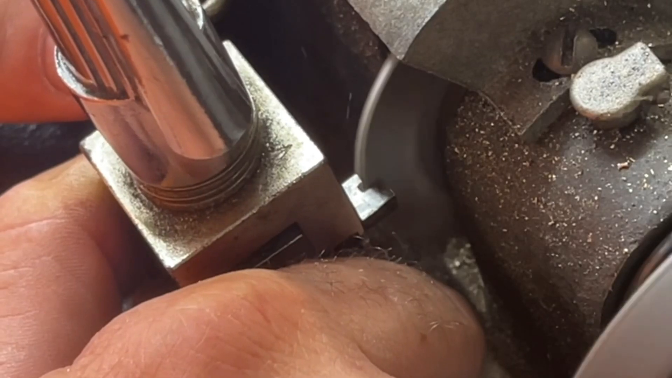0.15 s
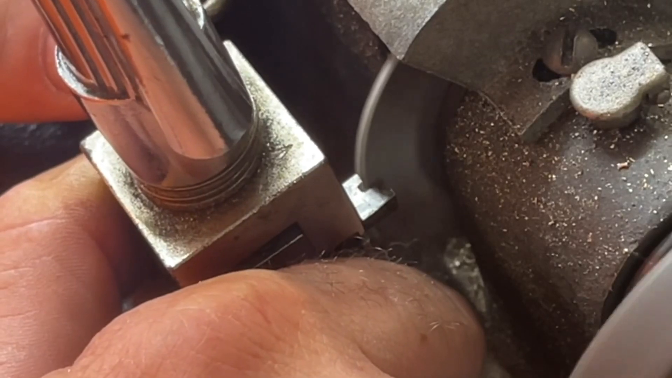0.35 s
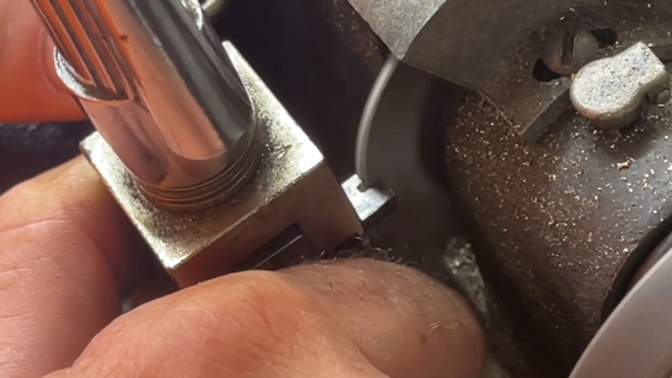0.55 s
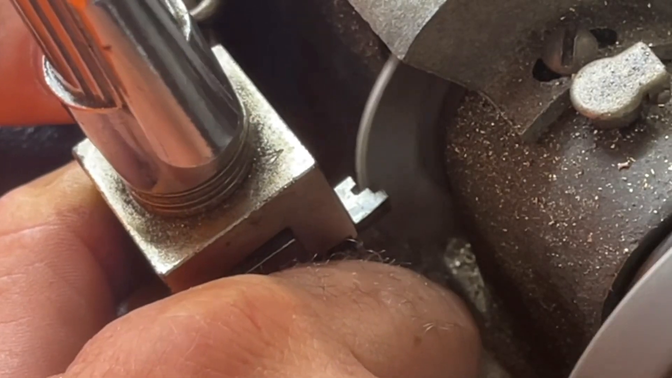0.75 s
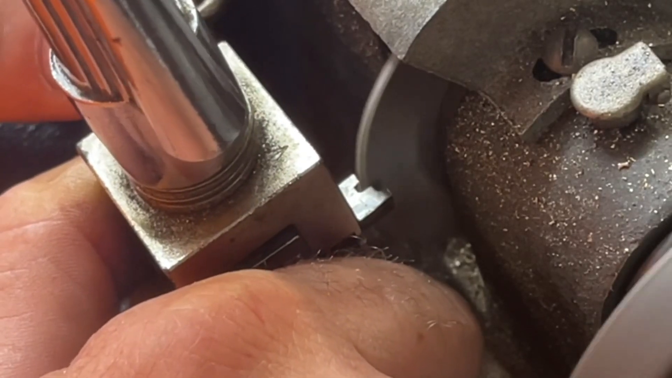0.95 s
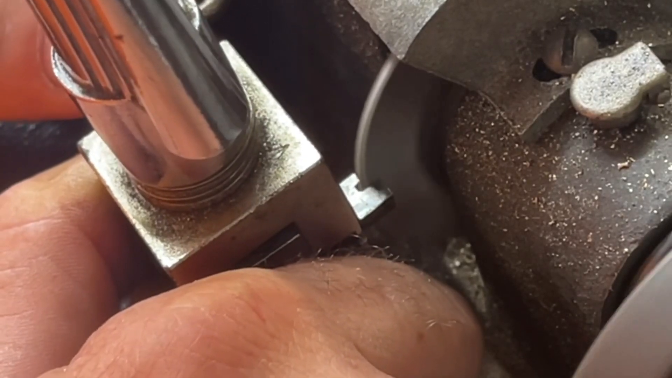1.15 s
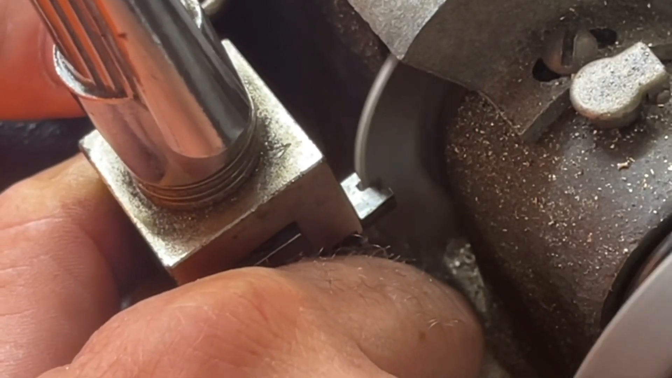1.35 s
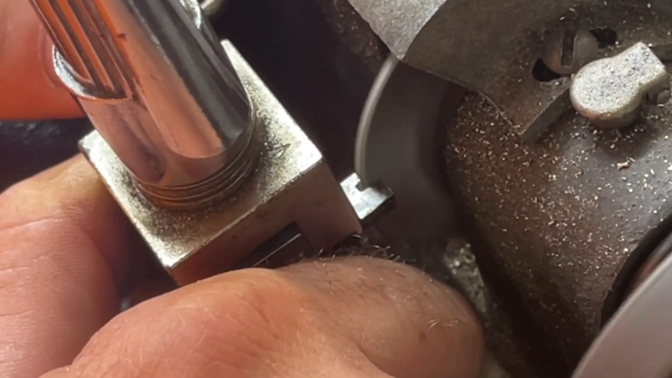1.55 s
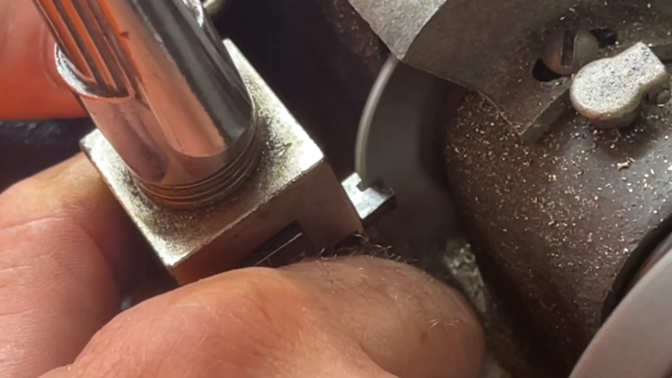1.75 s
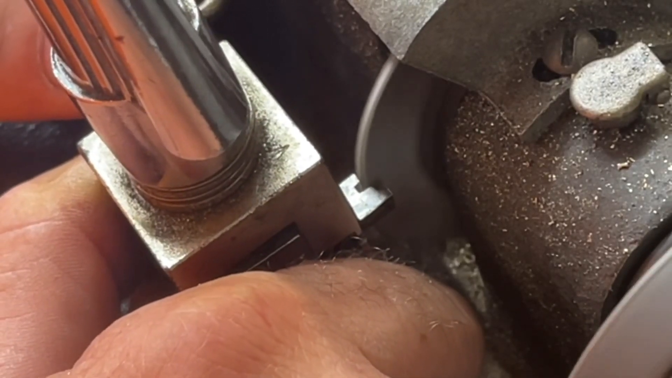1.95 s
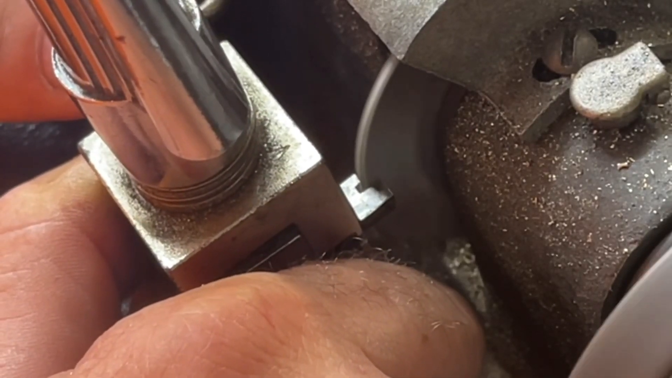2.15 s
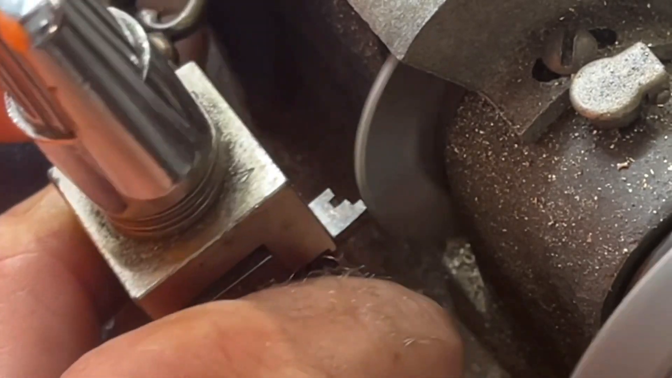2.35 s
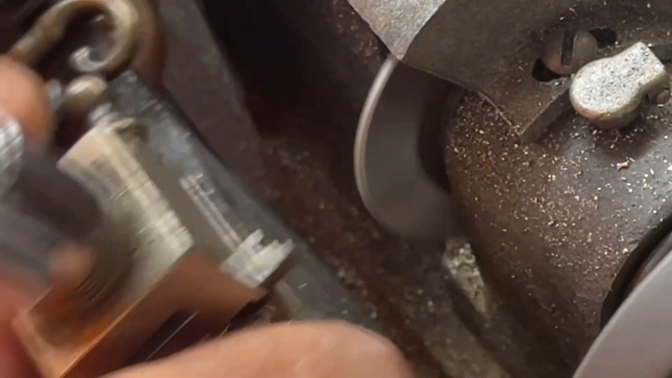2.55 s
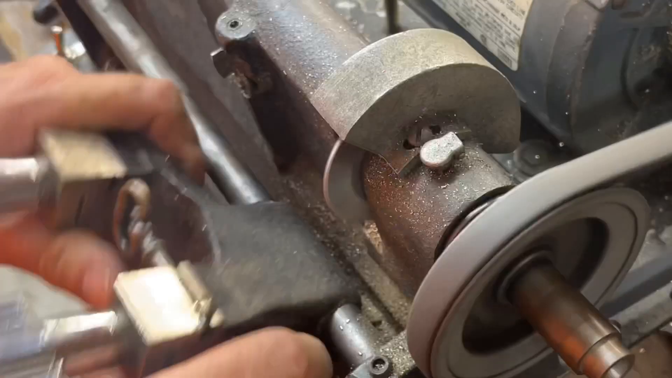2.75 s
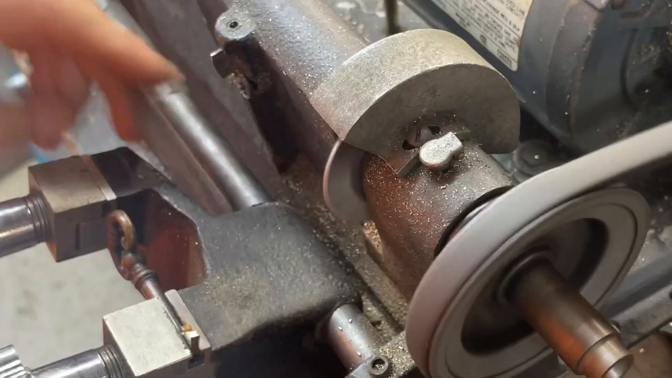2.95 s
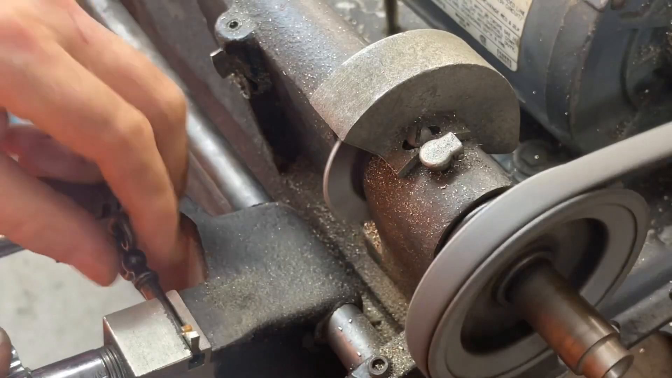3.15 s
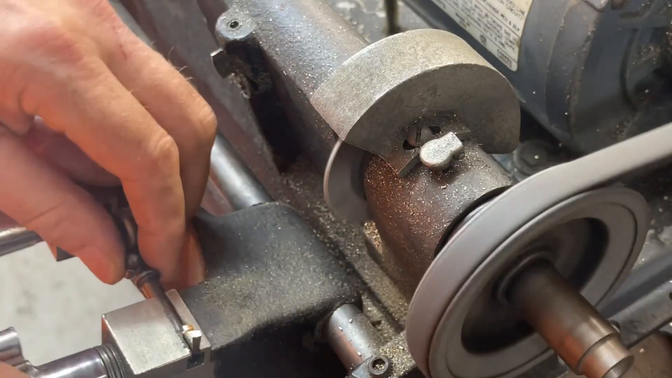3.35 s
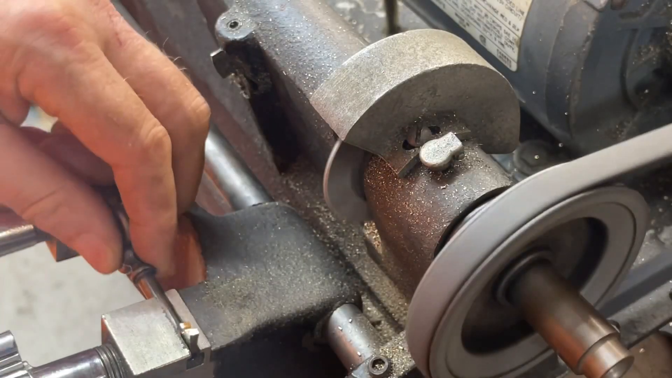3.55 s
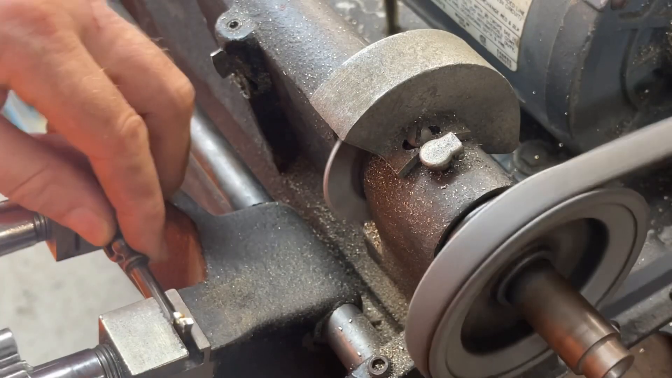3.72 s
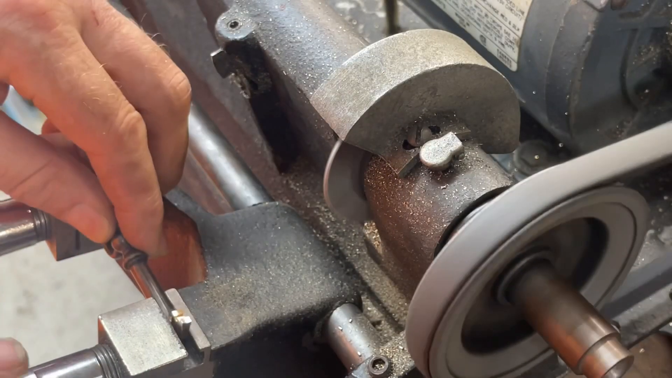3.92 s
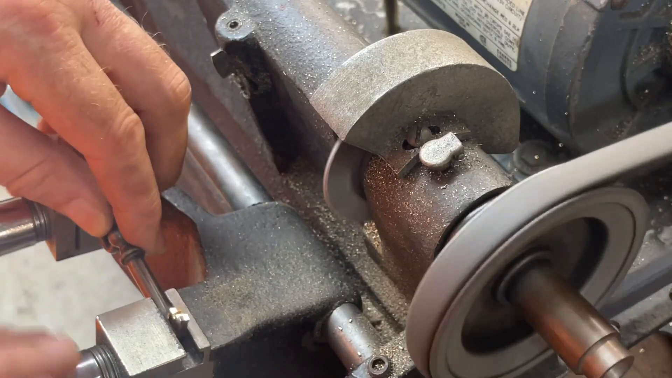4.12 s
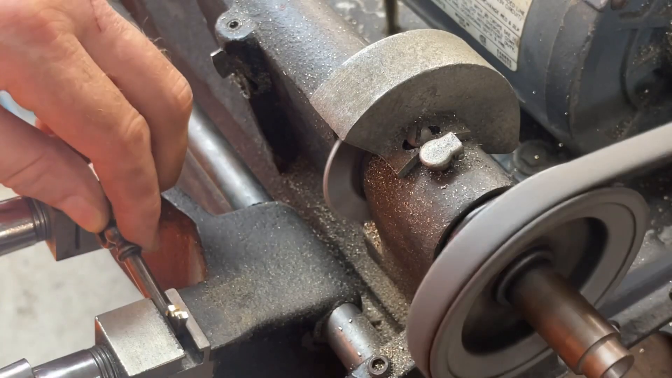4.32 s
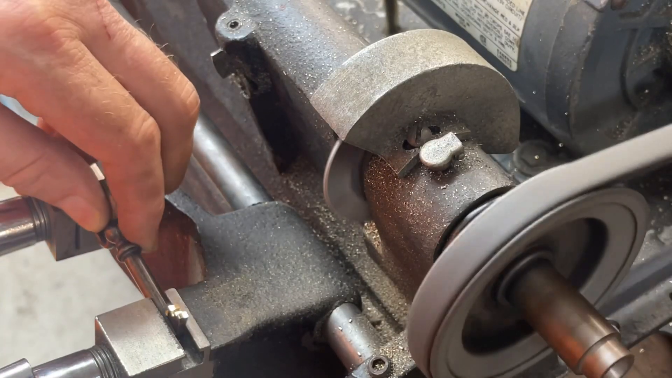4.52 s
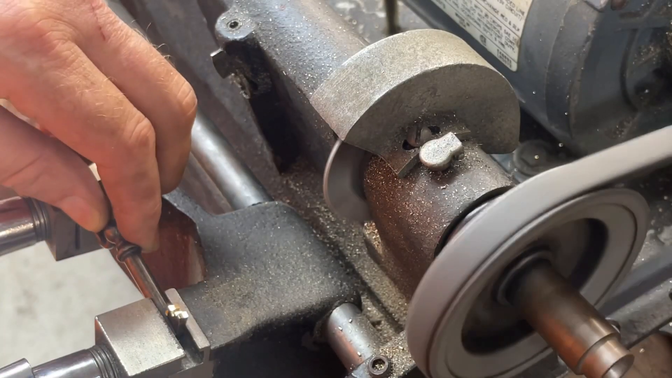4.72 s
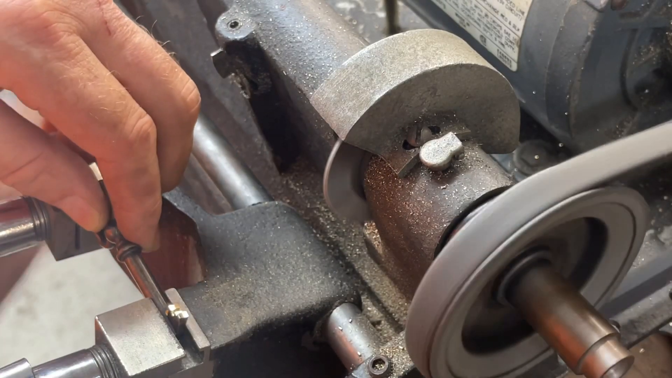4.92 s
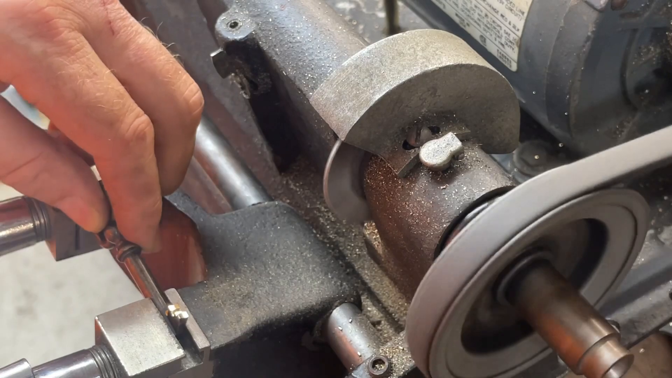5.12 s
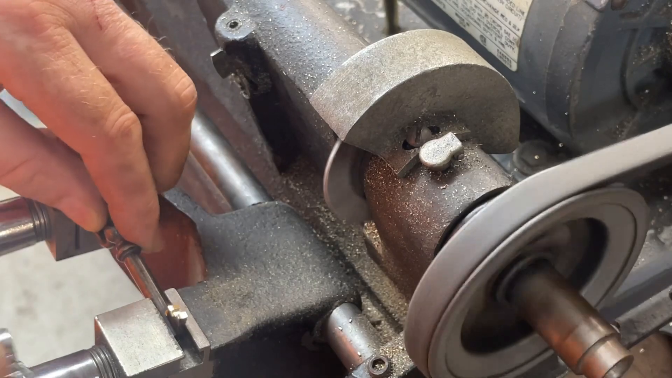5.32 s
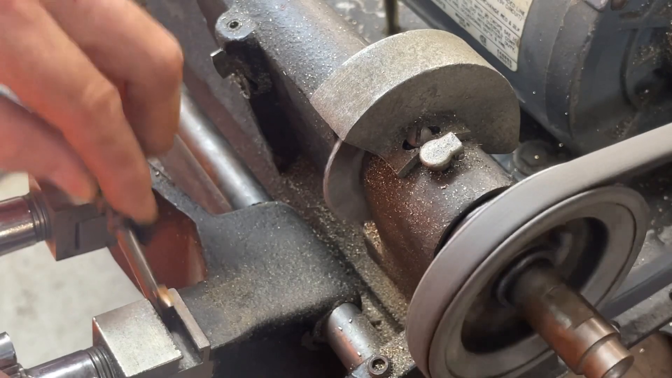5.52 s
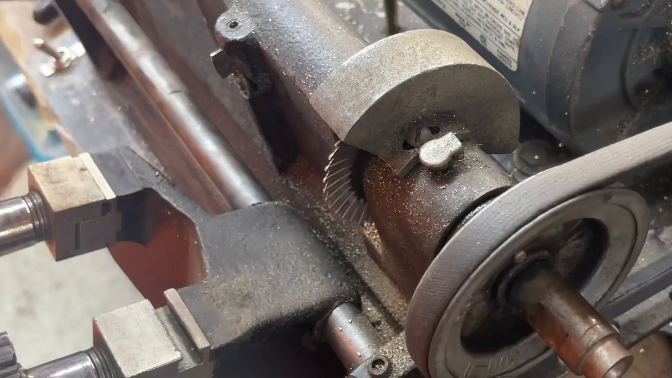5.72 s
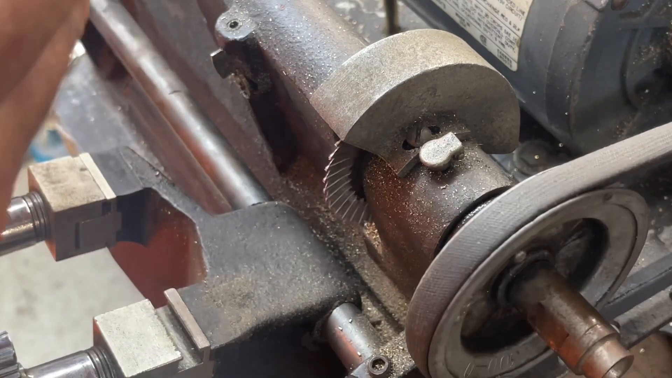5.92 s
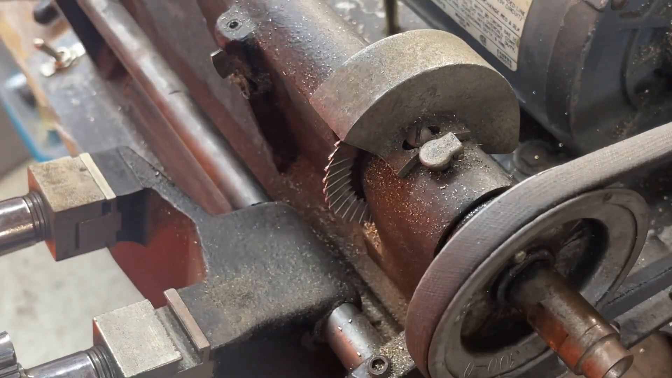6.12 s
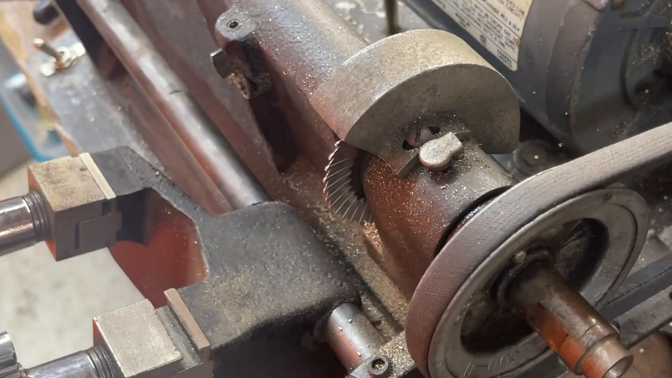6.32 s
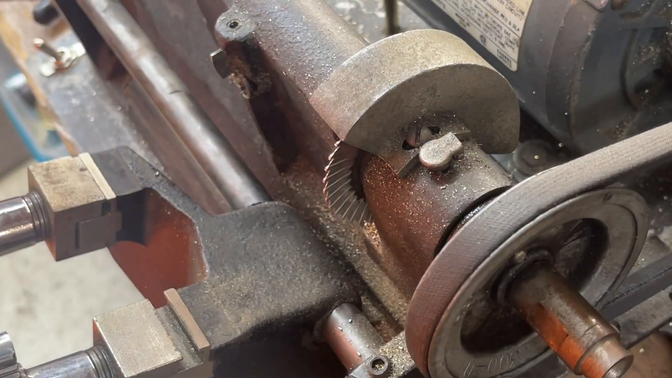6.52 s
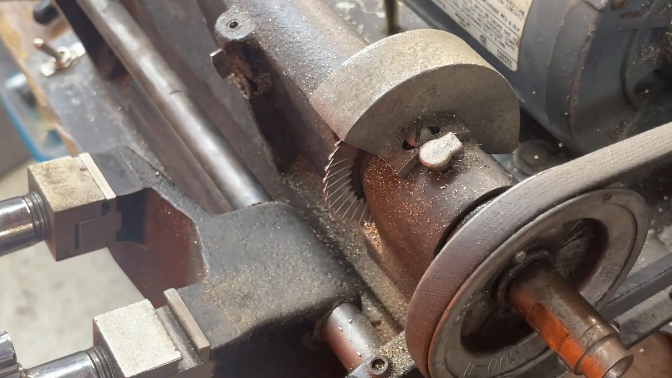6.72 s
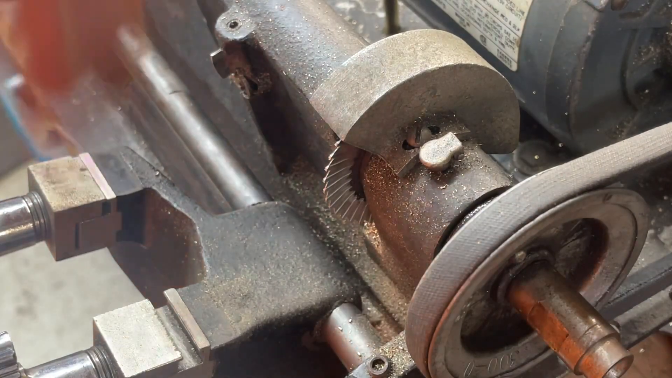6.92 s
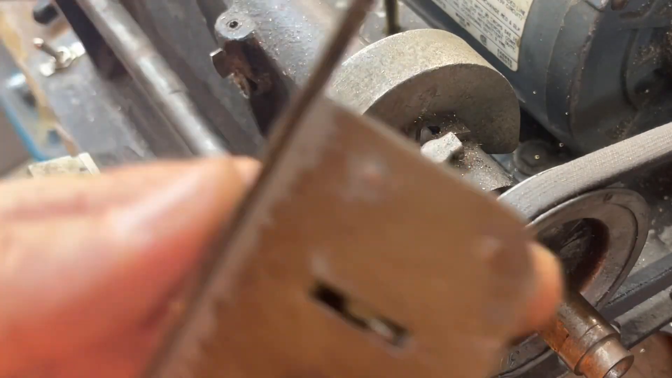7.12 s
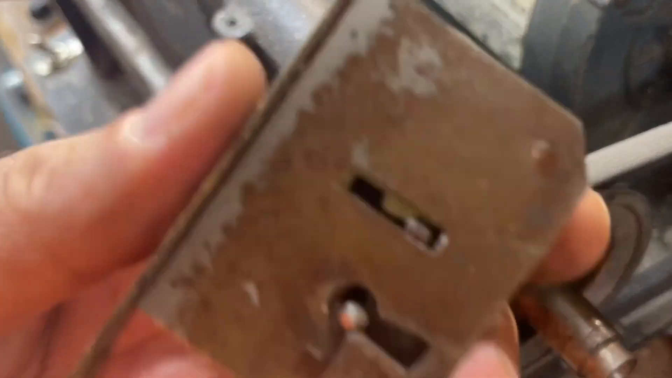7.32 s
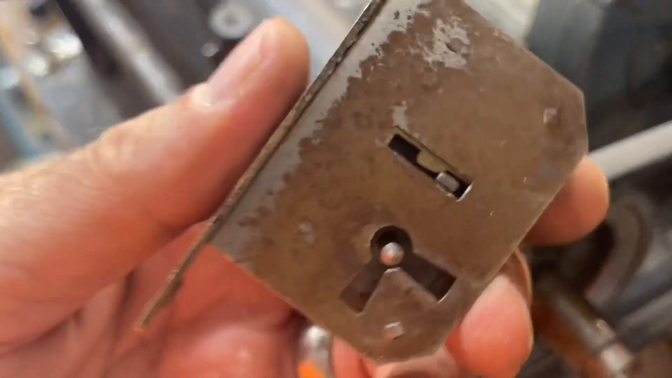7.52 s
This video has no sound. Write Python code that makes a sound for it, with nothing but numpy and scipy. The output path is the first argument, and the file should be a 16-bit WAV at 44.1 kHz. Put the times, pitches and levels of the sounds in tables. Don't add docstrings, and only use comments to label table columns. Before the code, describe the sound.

Close workshop machine: rattling motor hum, gritty metal cutting, a heavy clunk, a sharp switch click, slowing knocks, then quiet handling and a metallic scrape.

```python
import sys
import numpy as np
from scipy import signal
from scipy.fft import rfft, irfft, next_fast_len
from scipy.io import wavfile
from scipy.ndimage import uniform_filter1d

SR = 44100
rng = np.random.default_rng(int(sys.argv[2]) if len(sys.argv) > 2 else 0)


def wrap_up_sound(samples):
    columns = np.atleast_2d(samples).T
    tamed = np.clip(columns, -1, 1)
    steps = np.round(tamed * 32767).astype(np.int16)
    wavfile.write(sys.argv[1], SR, steps)


def elevation(decibels):
    levels = np.asarray(decibels, float)
    return 10 ** (levels / 20)


N = 338247

SPINDLE_PER_S, MOTOR_PER_S, OFF_S = 19.221, 29.62, 4.77
COAST_S, COAST_PER_S, DRAG_PER_S2 = 4.7925, 17.614, 21.22
# [f/Hz, width/Hz, level/dB]
CASTING = [(349, 7, -6), (453.5, 16.8, 2.5), (560, 44, 2.5), (668.4, 50, -3), (733, 23, 4),
           (858, 48.3, 2.5), (1072, 200, -7.5), (1453, 86, -2), (1623, 340, -11), (1937, 290, -13),
           (2150, 170, -7.5), (2730, 190, -19), (3190, 130, -21)]
# [t/s, level/dB]
REST = [
    (5.452, -30),
    (5.6475, -58.5),
]


def evened(x):
    return x / np.sqrt(np.mean(x ** 2) + 1e-20)


def read(points, hz):
    f, value = np.transpose(points)
    return np.interp(np.log(hz + 1), np.log(f + 1), value)


def curve(rows, column=1):
    rows = np.array(rows, float)
    return np.interp(np.arange(N) / SR, rows[:, 0], rows[:, column])


def colour(x, gain):
    size = next_fast_len(len(x))
    spectrum = rfft(x, size) * gain(np.fft.rfftfreq(size, 1 / SR))
    return irfft(spectrum, size)[:len(x)]


def tinted(points):
    return evened(colour(rng.standard_normal(N), lambda hz: elevation(read(points, hz))))


def ring(x, modes, turn=-1):
    out, power = 0, 0
    for k, (hz, width, db) in enumerate(modes):
        r = np.exp(-np.pi * width / SR)
        poles = [1, -2 * r * np.cos(2 * np.pi * hz / SR), r * r]
        out = out + turn ** k * elevation(db) * (1 - r) * signal.lfilter([1, 0, -1], poles, x)
        power += elevation(2 * db) * (1 - r)
    return out / np.sqrt(power)


def contact(times, db, length, tail):
    out = np.zeros(N)
    for s, gain, span in np.broadcast(times, elevation(db), length):
        part = out[round(s * SR):][:max(round(span * SR), 2)]
        part += gain * np.sin(np.pi * (np.arange(len(part)) + 1) / (len(part) + 1)) ** 0.47
    r = np.exp(-1 / (tail * SR))
    return np.maximum(out, 1.28 * signal.lfilter([1 - r], [1, -r], out))


def blows(times, db):
    out = np.zeros(N)
    out[np.round(np.asarray(times) * SR).astype(int)] = elevation(db)
    return out


def gritty(per_s, spread_db):
    hit = rng.random(N) < per_s / SR
    return evened(hit * rng.standard_normal(N) * elevation(spread_db * np.minimum(rng.exponential(1, N), 4)))


def touches(rows):
    out = np.zeros(N)
    t = np.arange(4096) / SR
    for s, db, hz, octaves, length in rows:
        noise = rng.standard_normal(4096)
        noise = evened(colour(noise, lambda f: np.exp(-(np.log2((f + 1) / hz) / octaves) ** 2)))
        rise = np.minimum(t / max(0.00019, 0.7 / hz), 1)
        part = out[round(s * SR):][:4096]
        part += (elevation(db) * noise * rise * np.exp(-t / length))[:len(part)]
    return out


def coasting(turns):
    speed = np.sqrt(COAST_PER_S ** 2 - 2 * DRAG_PER_S2 * np.asarray(turns))
    return COAST_S + (COAST_PER_S - speed) / DRAG_PER_S2, speed / SPINDLE_PER_S


def shop():
    # [f/Hz, level/dB per Hz]
    room = [(15, -51.5), (27, -29), (62, 0.5), (87, -16), (120, -6.5), (155, -16), (250, -21.5),
            (400, -32.5), (1000, -35.5), (3000, -57), (11800, -57.5), (13000, -82.5)]
    return elevation(-55.5) * tinted(room)


def hands():
    # [t/s, level/dB]
    drag = [(5.4, -52.5), (5.6, -69.5), (5.8, -81), (6.3, -81.5), (6.62, -79), (6.75, -67), (6.97, -70.5),
            (7.17, -69), (7.24, -79)]
    # [f/Hz, level/dB]
    rub = [(400, 2.5), (1000, -7), (2200, -3.5), (3500, -7), (5200, -8.5), (8000, -7.5), (12000, -18),
           (14000, -17)]
    # [peak t/s, level/dB, rise/(dB/s), fall/(dB/s)]
    squeaks = [
        (5.68, -65.5, 110, 73),
        (7.0, -62, 80, 102),
    ]
    # [f/Hz, width/Hz, level/dB]
    rod = [(5130, 770, 0), (6000, 230, 3)]
    # [f/Hz, width/Hz, level/dB]
    lock_plate = [(2100, 118, -5), (2380, 90, 1), (2920, 50, -7), (4250, 54, -2), (4570, 81, 0),
                  (3200, 500, -19), (5270, 80, -9), (5680, 120, -11), (5950, 200, -11), (7270, 150, -12),
                  (8270, 220, -7), (11600, 570, -12.5)]
    # [t/s, level/dB, length/s]
    scuffs = [(5.325, -48, 0.035), (5.351, -31.5, 0.0082), (5.381, -44, 0.019), (6.362, -65.5, 0.035),
              (6.453, -68, 0.018), (6.498, -63, 0.024), (6.816, -71, 0.034), (7.032, -66, 0.095)]
    slide_s, slide_db, slide_rise_s, slide_hold_s, slide_fade_db_per_s = 7.507, -54.5, 0.0057, 0.054, 198
    sag_per_s = 0.35

    t = np.arange(N) / SR
    start = np.clip((t - drag[0][0]) / 0.043, 0, 1)
    uneven = elevation(1.1 * evened(uniform_filter1d(rng.standard_normal(N), 500)))
    grain = evened(uneven * gritty(per_s=5000, spread_db=0))
    broad = evened(colour(grain, lambda hz: elevation(read(rub, hz))))
    low = evened(colour(broad, lambda hz: 1 / (1 + (hz / 4000) ** 4)))
    high = evened(colour(broad, lambda hz: 1 / (1 + (6000 / (hz + 1)) ** 4)))
    drag_db = curve(drag)
    grip = elevation(-63.5) * np.clip((t - 7.39) / 0.326, 0, 1)
    shrill = elevation(-71.5 + 1.08 * (drag_db + 68.5))
    squeak = sum(elevation(db - 2 + np.minimum(rise * (t - s), fall * (s - t))) for s, db, rise, fall in squeaks)
    rustle = (elevation(drag_db) + grip) * low + shrill * high + squeak * ring(grain, rod)

    fade_db = slide_fade_db_per_s * np.maximum(t - slide_s - slide_hold_s, 0)
    thumb = np.clip((t - slide_s) / slide_rise_s, 0, 1) * elevation(slide_db - fade_db)
    plate = ring(gritty(per_s=6000, spread_db=-6.5), lock_plate)
    plate = np.interp(t - 0.5 * sag_per_s * np.maximum(t - slide_s - 0.05, 0) ** 2, t, plate)
    scuffing = uniform_filter1d(contact(*np.transpose(scuffs), 0.012), 150) * broad
    return start * rustle + scuffing + thumb * plate


def bumps():
    # [t/s, level/dB, f/Hz, swell/s]
    knuckles = [
        (6.364, -42, 247, 0.013),
        (6.661, -51.5, 474, 0.0047),
        (7.044, -51, 493, 0.0047),
    ]
    t = np.arange(N) / SR
    out = np.zeros(N)
    for s, db, hz, swell in knuckles:
        u = np.maximum(t - s, 0) / swell
        out += elevation(db) * u * np.exp(1 - u) * np.sin(2 * np.pi * hz * swell * u)
    return out


def handling():
    # [t/s, level/dB, centre f/Hz, width/octaves]
    small = [(5.388, -41, 1950, 2.9), (5.459, -42, 8760, 1.3), (5.485, -48, 6630, 0.72),
             (5.523, -48, 7270, 0.44), (5.542, -44, 2548, 2.5), (5.572, -45, 2780, 4.5),
             (5.613, -48, 8230, 1.4), (5.6466, -44.5, 8400, 1.7), (5.851, -59, 4630, 1.57),
             (6.662, -48.5, 1090, 1.2), (5.559, -49, 3000, 1.3), (5.464, -44, 3000, 0.71),
             (7.327, -59, 1510, 0.98), (7.47, -66.5, 3010, .5), (6.696, -60, 2090, 1.3),
             (6.814, -44.5, 7400, 0.86), (6.809, -56, 5000, 1), (7.164, -51, 11300, 1.7),
             (7.346, -46.5, 10060, 1.3), (7.348, -55, 3080, 0.4), (7.376, -58, 6000, 0.4),
             (7.5186, -53, 4486, 1.6)]
    # [t/s, level/dB, centre f/Hz]
    thuds = [(5.469, -40, 230), (5.581, -47, 330), (5.645, -51, 694), (6.367, -52, 302), (6.461, -52, 222),
             (6.507, -62, 226), (6.659, -51.5, 473), (6.822, -61, 197), (7.044, -58, 496),
             (7.325, -63, 192), (7.158, -63, 400)]
    # [t/s, level/dB, centre f/Hz, length/s]
    flicks = [(5.343, -33.5, 1193, 0.031), (5.352, -25.5, 13020, 0.012), (5.355, -30, 7900, 0.0087),
              (5.358, -25.5, 1120, 0.012), (5.538, -49, 1150, 0.03), (6.374, -56, 217, 0.031),
              (5.352, -32.5, 2600, 0.0073), (5.356, -31.5, 3350, 0.0076), (5.357, -35.5, 5240, 0.0065),
              (6.509, -59, 710, 0.0225), (6.818, -56, 3800, 0.0087), (6.821, -59, 2074, 0.027)]
    # [t/s, level/dB]
    fidgets = [(3.266, -35.5), (3.32, -51), (3.8367, -38), (3.992, -34), (4.199, -39), (4.356, -40)]
    rows = [(*row, 0.0032) for row in small]
    rows += [(*row, 0.85, 0.022) for row in thuds]
    rows += [(s, db, hz, 0.29, length) for s, db, hz, length in flicks]
    rows += [(*row, 9000, 0.55, 0.004) for row in fidgets]
    return touches(rows) + bumps()


def switch():
    # [t/s, level/dB, contact/s]
    snaps = [
        (4.751, -30.5, 0.0035),
        (4.7531, -14, 0.0047),
    ]
    # [t/s, level/dB]
    stops = [
        (4.7556, 11),
        (4.7576, 9.5),
        (4.7633, 2.5),
    ]
    # [f/Hz, level/dB, time to fall 60 dB/s]
    parts = [(1570, -9.5, .024), (1950, 1, .016), (2040, -1.5, 0.0091), (2280, 8, 0.041),
             (2800, -7.5, .015), (3254, -7.5, 0.027), (3700, -4.5, 0.032), (3875, -4, 0.041),
             (4070, -14, 0.022), (5362, -17.5, .03), (7740, -9.5, .04)]
    hiss = contact(*np.transpose(snaps), 0.0069) * rng.standard_normal(N)
    hiss = colour(hiss, lambda hz: (0.45 + 1 / (1 + (7200 / (hz + 1)) ** 6)) / (1 + (hz / 14800) ** 16))
    modes = [(hz, 2.2 / t60, db) for hz, db, t60 in parts]
    return ring(blows(*np.transpose(stops)), modes) + elevation(-4) * hiss


def carriage_drop():
    # [t/s, level/dB, centre f/Hz, width/octaves, length/s]
    drops = [(2.7852, -12.5, 3000, 1.3, 0.002), (2.79, -28, 6000, .8, .006),
             (2.7855, -10.5, 2300, 0.54, 0.0049), (2.787, -10.5, 1100, 0.82, 0.012),
             (2.788, -20, 195, 0.55, 0.019), (2.790, -5.5, 417.5, 0.33, 0.0076),
             (2.799, -19.5, 604, 1.2, 0.0073), (2.809, -26.5, 450, 2.3, 0.014),
             (2.818, -24, 1000, 1.2, 0.009)]
    return touches(drops)


def slap_times():
    slapping = [2, 3, 4, 5, 6, 7, 9]
    return coasting((np.array(slapping) + 0.07) * SPINDLE_PER_S / MOTOR_PER_S)


def belt_slaps():
    rows = [(s, -28.5 + 36 * np.log10(speed), 2300, 0.59, 0.0063) for s, speed in zip(*slap_times())]
    return touches(rows)


def running():
    t = np.arange(N) / SR
    speed = np.clip((COAST_PER_S - DRAG_PER_S2 * (t - COAST_S)) / SPINDLE_PER_S, 1e-6, 1)
    return elevation(20 * np.log10(uniform_filter1d(speed, size=4000)))


def motor_hum():
    # [f/Hz, rms level/dB, start/turns]
    hum = [(120, -33.5, 0), (118.48, -44, .456), (103.7, -37, .2), (113.1, -43, .1), (236.96, -51, 0),
           (99.6, -50, .7), (84.8, -51, .3)]
    # [t/s, level/dB]
    tension = [(0, -1), (1.2, -2), (2.8, 1.5), (3.0, -10), (4.2, -23), (4.75, -19), (4.85, -11.5)]
    t = np.arange(N) / SR
    on = np.interp(t, [OFF_S, OFF_S + 0.063], [1, 0])
    tones = [elevation(db) * np.sqrt(2) * np.cos(2 * np.pi * (hz * t + turns)) for hz, db, turns in hum]
    return on * (sum(tones) + tones[2] * (elevation(curve(tension)) - 1))


def motor_knocks(run):
    # [t into the motor turn/s, level/dB]
    knocks = [(.0012, -26.5), (.0042, -26.5), (.0072, -33), (.011, -31.5), (.0238, -30.5), (.0295, -37)]
    # [t into the motor turn/s, level/dB]
    taps = [(-.0003, -25.5), (.0014, -25.5), (.0045, -30), (.0211, -26.5), (.0231, -23), (.0262, -31)]
    # [f/Hz, width/Hz, level/dB]
    sheet = [(1900, 250, -2), (2300, 200, -1), (2500, 330, -1), (2800, 220, 0.5), (3150, 170, -4.5),
             (3800, 400, -8.5)]
    # [f/Hz, width/Hz, level/dB]
    bench = [(106, 35, 0)]
    play_s, knock_spread_db, tap_spread_db = 0.0003, 2.0, 5

    turn = np.arange(0.0125, OFF_S, 1 / MOTOR_PER_S)
    chance = rng.standard_normal((len(turn), 4, len(knocks)))
    knocking, tapping = np.zeros(N), np.zeros(N)
    for k, (lag, db) in enumerate(knocks):
        times = turn + lag + play_s * chance[:, 0, k]
        knocking += contact(times, db + knock_spread_db * chance[:, 1, k], 0.00047, 0.0001)
    for k, (lag, db) in enumerate(taps):
        times = turn + lag + play_s * chance[:, 2, k]
        tapping += blows(times, db + tap_spread_db * chance[:, 3, k])

    slower, share = coasting((np.arange(-1, 11) + 0.44) * SPINDLE_PER_S / MOTOR_PER_S)
    endings = [(slower, -19 - 2 * np.log10(share)), (slap_times()[0], -24), REST[0]]
    last = elevation(-3.5) * sum(contact(s, db, 0.00046, 0.00012) for s, db in endings)
    last = last + 0.526 * np.roll(last, round(0.0045 * SR)) + 0.28 * np.roll(last, round(0.00863 * SR))
    rattle = elevation(-38.0) * run ** 2.3 * gritty(per_s=900, spread_db=2.2)

    casting = ring(knocking, CASTING, turn=0.95) + ring(last + rattle, CASTING)
    casting = colour(casting, lambda hz: 1 / (1 + (hz / 11000) ** 12) / (1 + (260 / (hz + 1)) ** 4))
    return casting + ring(tapping, sheet) + elevation(-42) * ring(ring(last, bench), bench)


def motor():
    # [f/Hz, level/dB per Hz]
    rumble = [(20, -49.5), (40, -13.5), (70, -9.5), (100, 1), (125, -17), (170, -11.5), (300, -13),
              (740, -7.5), (1900, -31.5), (4000, -40.5), (9000, -41.5), (12200, -51), (13000, -68.5),
              (16000, -87)]
    run = running()
    return motor_hum() + motor_knocks(run) + elevation(-35.5) * run ** 0.91 * tinted(rumble)


def spindle():
    # [t/s, lateness/s]
    lateness = [(0, -.0008), (.5, -.0008), (.6, .0012), (1, .0017), (2.1, .0012), (2.6, 0), (4.77, -.0002)]
    # [f/Hz, level/dB per Hz]
    tick = [(500, -28.5), (1000, -5.5), (2200, -3.5), (3400, -5), (4500, -25.5), (6500, -19), (9000, -19.5),
            (12500, -24), (14000, -40.5), (16000, -49)]
    # [f/Hz, width/Hz, level/dB]
    wheel = [(3780, 110, -4), (4462, 150, -0.5), (5325, 360, -5.5), (6600, 250, -6.5), (8330, 540, -19),
             (11300, 440, -13.5)]
    # [f/Hz, width/Hz, level/dB]
    arbor = [(2240, 200, -0.5), (2640, 240, -5), (2978, 120, 1), (3320, 97, -10), (3440, 37, -7.5),
             (3667, 30, -5.5), (4140, 220, -13.5), (4540, 55, 5.5), (5150, 140, -7.5), (5353, 150, -3),
             (5820, 110, -19), (7000, 160, -14), (7400, 530, -17.5), (8230, 460, -16.5)]
    # [f/Hz, width/Hz, level/dB]
    guard = [(2150, 330, -3.5), (2733, 340, 2.4)]
    slowing_db = 29

    turn = np.arange(0.0062, OFF_S, 1 / SPINDLE_PER_S)
    chance = rng.standard_normal((len(turn), 4))
    turn = turn + np.interp(turn, *np.transpose(lateness)) + 0.00035 * chance[:, 0]
    scuff = contact(turn, -34 + chance[:, 1], 0.0043, 0.0042)
    far_db = -50 + 4 * np.clip(chance[:, 3], -3, 1.6)
    far = contact(turn + 0.034 + 0.002 * chance[:, 2], far_db, 0.004, 0.004)
    slower, speed = coasting(np.arange(8))
    last = contact(slower, -39 + slowing_db * np.log10(speed), 0.0045, 0.015)
    last = last + contact(*REST[1], 0.012, 0.0091)
    grit = gritty(per_s=25000, spread_db=1.2)
    drive = (scuff + far + elevation(2) * last) * grit
    bright = evened(colour(drive, lambda hz: elevation(read(tick, hz)))) * np.std(drive)
    late = np.roll(drive, round(0.003085 * SR))
    body = elevation(12.5) * ring(uniform_filter1d(late, size=3), CASTING)

    spot = np.r_[turn, slower] + 0.0004
    force_db = np.r_[3 * chance[:, 1], slowing_db * np.log10(speed)]
    struck = ring(blows(spot, -14 + force_db), arbor)
    thump = ring(contact(spot + 0.002946, -29 + force_db, 0.00038, 0.0001), CASTING, turn=1)

    patter = 0.00078 * gritty(per_s=240, spread_db=2) * (np.arange(N) < OFF_S * SR)
    guarded = elevation(6) * ring((far + patter) * grit, guard)
    return struck + thump + bright + elevation(-2.5) * ring(drive, wheel) + body + guarded


def cutting():
    # [first t/s, turns]
    high_spot = [
        (.0042, 11),
        (1.2695, 12),
    ]
    # [t/s, level/dB]
    pressure = [(0, -17), (.055, -16), (.11, -13), (.17, -18), (.22, -12.5), (.32, -13.5), (.42, -10.5),
                (.47, -9.5), (.53, -23), (1.27, -29.5), (1.32, -18), (1.375, -17.5), (1.43, -35.5),
                (1.48, -24.5), (1.53, -44), (1.63, -23), (1.7, -19.5), (1.85, -32)]
    # [t/s, level/dB, length/s]
    chatter = [(0.0285, -24.5, 0.026), (0.0733, -12, 0.0031), (0.0874, -16, 0.0028), (0.128, -27.5, 0.0027),
               (0.146, -18, 0.0033), (0.241, -34.5, 0.014), (0.345, -20.5, 0.017), (0.443, -34, 0.025),
               (1.031, -26.5, 0.0035), (1.182, -29.5, 0.009), (1.281, -21, 0.011), (1.65, -28.5, 0.013),
               (1.7, -35.5, 0.015)]
    # [t/s, level/dB, length/s]
    grazes = [(0.033, -37, 0.2), (0.21, -43.5, 0.06), (0.336, -35.5, 0.16), (1.256, -54, 0.088),
              (1.301, -34, 0.05), (1.629, -32, 0.089)]
    # [f/Hz, width/Hz, level/dB]
    key = [(4620, 80, 0), (5250, 190, -4), (5540, 160, -1.5), (5720, 200, -14.5), (6800, 160, -8),
           (8150, 670, -15), (8740, 310, -18.5), (10710, 240, -16), (12340, 270, -15.5),
           (12700, 290, -13.5)]
    # [f/Hz, level/dB per Hz]
    chips = [(1200, -5), (2200, -10.5), (3300, -8.5), (4100, -33), (5000, -7.5), (7400, -17), (12000, -14),
             (13600, -10.5), (14700, -2), (15600, -17.5)]
    teeth_per_turn = 48

    wobble = 0.12 * evened(uniform_filter1d(rng.standard_normal(N), 60))
    phase = np.arange(N) / SR * SPINDLE_PER_S * teeth_per_turn + wobble
    strike = np.diff(np.floor(phase), prepend=0) > 0
    teeth = evened(strike * elevation(2.5 * rng.standard_normal(N)))
    spots = np.concatenate([first + np.arange(turns) / SPINDLE_PER_S for first, turns in high_spot])
    spots = spots + 0.00043 * np.clip(rng.standard_normal(len(spots)), -2, 2)
    press = contact(spots, np.interp(spots, *np.transpose(pressure)), 0.0045, 0.0047)
    press += contact(*np.transpose(chatter), 0.0012) + contact(*np.transpose(grazes), 0.0041)
    drive = press * (0.81 * teeth + 0.58 * rng.standard_normal(N))
    shallow = np.arange(N) / SR > 0.8
    blank = ring(drive, key[1:]) + elevation(np.where(shallow, 1, -8.5)) * ring(drive, key[:1])
    spray = elevation(-11.5) * press * tinted(chips)
    return elevation(0.5 * shallow - 9.5) * blank + spray + elevation(-14.0) * ring(drive, CASTING)


def gain_control():
    duck_s, fall_s, hold_s, back_s = 2.8, 0.063, 0.047, 0.13
    t = np.arange(N) / SR
    duck = np.interp(t, duck_s + np.cumsum([0, fall_s, hold_s, back_s]), [0, 1, 1, 0])
    closer_db = np.interp(t, duck_s + np.array([0, fall_s, 2.22]), [0, 1, 0])
    return elevation(closer_db + 2 - 0.2117 * t - 10 * duck)


def two_ports(mix):
    # [f/Hz, level/dB]
    overall_colour = [(8500, 0), (10200, 7.5), (11500, 3.5), (12300, -1.5), (12900, -21.5), (13700, -23.5),
                      (14600, -10), (15500, -18), (16500, -40.5)]
    # [f/Hz, level/dB]
    unlike = [(30, -22), (80, -28.5), (200, -19.5), (700, -11), (1600, -13.5), (2400, -23), (3500, -12.5),
              (6500, -27.5), (9300, -22), (10300, -17.5), (11500, -17)]
    # [t/s, unlike part level/dB, share of the whole sound pushed to the left]
    width = [(0, 3, 1), (2.76, 3, 1), (2.8, 0, -.15), (5.5, 0, -.15), (5.7, 8, .6), (7.67, 8, .6)]
    # [f/Hz, phase/rad]
    ports = [(0, 0), (2400, 0), (3300, .25), (5800, 0), (8600, 0), (9100, -.6), (9800, -2.6), (10050, -3),
             (10450, -3.3), (11200, -4.9), (11900, -2 * np.pi), (12600, -6.6), (13250, -9), (14200, -9.6),
             (15000, -4 * np.pi)]

    mix = colour(mix, lambda hz: elevation(read(overall_colour, hz)))
    taps = rng.standard_normal(2000) * np.exp(-np.arange(2000) / (0.015 * SR))
    echo = signal.oaconvolve(mix, taps / np.linalg.norm(taps))[:N]
    echo *= evened(uniform_filter1d(rng.standard_normal(N), 1500))
    loose = elevation(curve(width)) * colour(echo, lambda hz: elevation(read(unlike, hz)))

    def aside(hz):
        louder = 0.15 * np.exp(-np.log2((hz + 1) / 480) ** 2 / 0.6)
        shifted = 0.3j * np.exp(-np.log2((hz + 1) / 800) ** 2 / 0.4)
        return louder - shifted

    loose += curve(width, column=2) * colour(mix, aside)
    left = colour(mix + loose, lambda hz: np.exp(0.5j * read(ports, hz)))
    right = colour(mix - loose, lambda hz: np.exp(-0.5j * read(ports, hz)))
    return np.array([left, right])


def scene():
    mix = shop() + hands() + handling() + belt_slaps() + motor() + spindle() + cutting()
    return two_ports(mix * gain_control() + carriage_drop() + switch())


def top_cut(x):
    return signal.sosfilt(signal.butter(12, 16600, fs=SR, output="sos"), x)


def record(dry):
    limited = 0.59 * np.tanh(dry / 0.64)
    return top_cut(limited)


dry = scene()
out = record(dry)
wrap_up_sound(out)
```